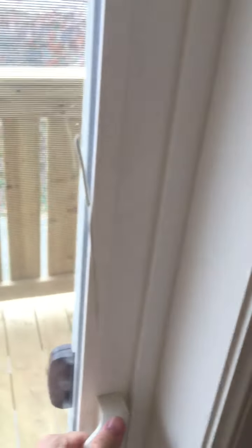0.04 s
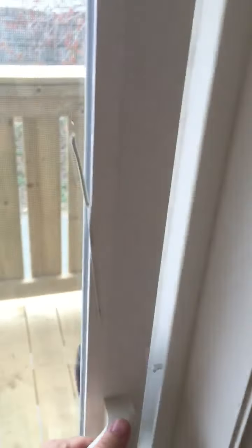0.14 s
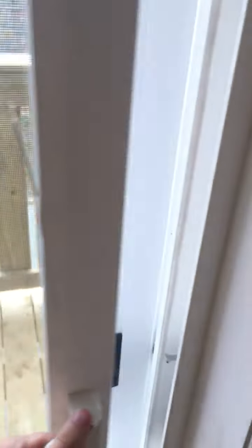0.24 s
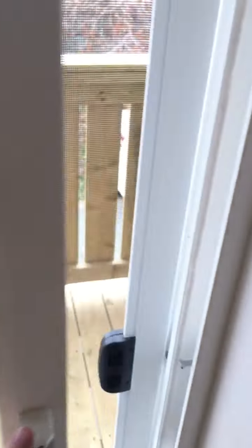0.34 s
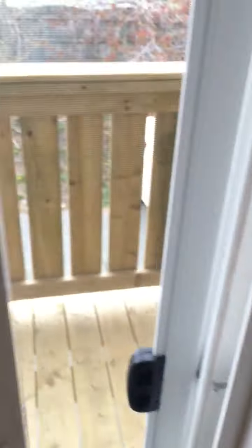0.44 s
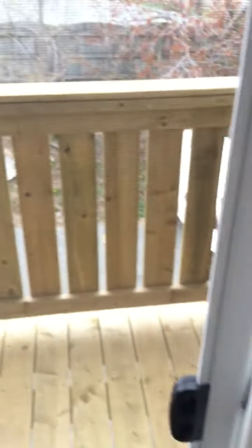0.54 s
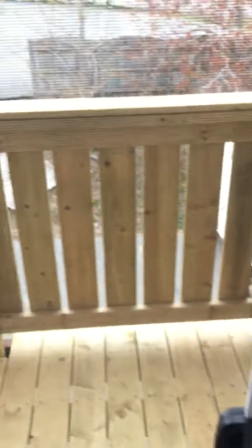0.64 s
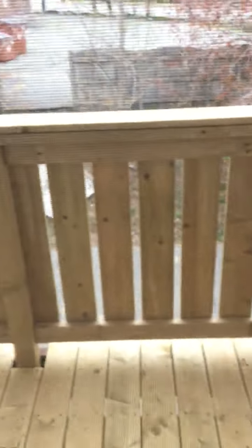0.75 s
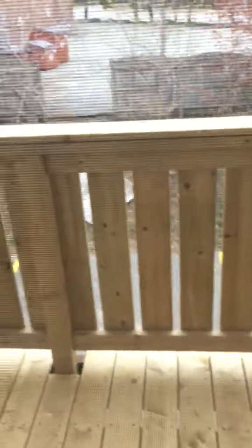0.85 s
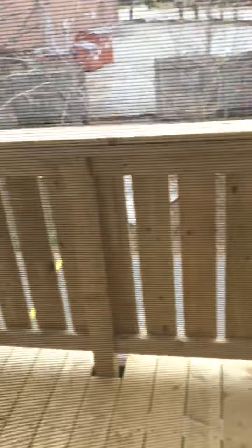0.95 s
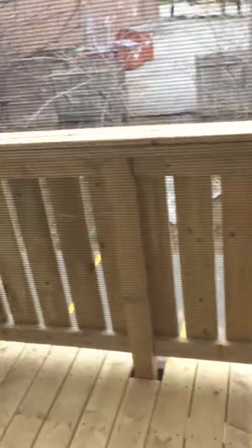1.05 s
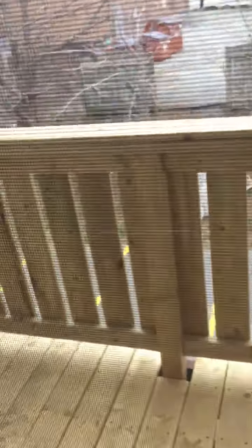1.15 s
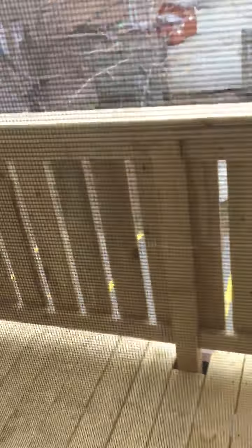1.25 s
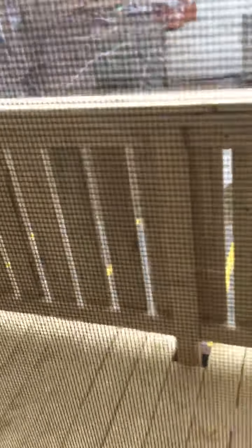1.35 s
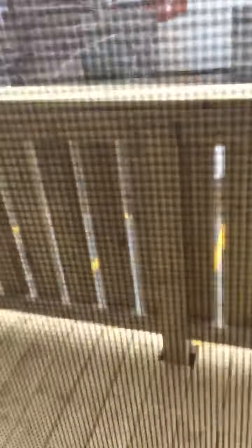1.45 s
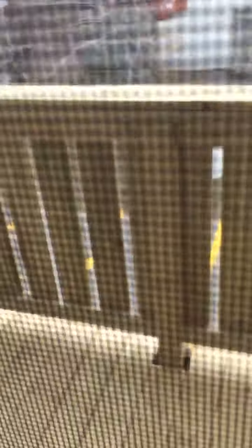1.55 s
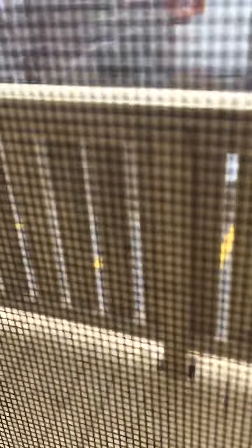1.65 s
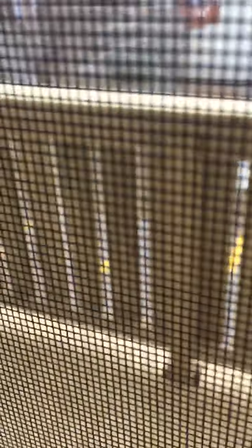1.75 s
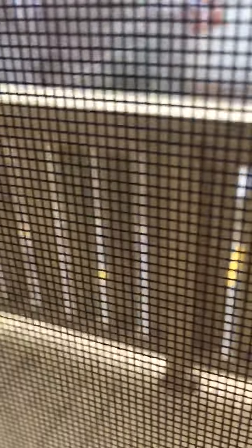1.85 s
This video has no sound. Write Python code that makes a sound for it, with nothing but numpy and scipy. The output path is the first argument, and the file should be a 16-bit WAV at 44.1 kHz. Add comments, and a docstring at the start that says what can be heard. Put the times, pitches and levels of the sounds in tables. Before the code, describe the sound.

A sliding glass door unlatches with a sharp metallic clack, rolls open with a brushing hiss and low rumble, then bumps its stop. The empty room rings and faint traffic drifts in. The microphone is close to the door.

```python
"""Sliding glass door in an empty room

One microphone, close to the door, with the bare room behind it. The door pulls out of its seal, the
latch clacks and rings, and it rolls open: the brush seal hisses on the track, the rollers rumble in the
pane. It bumps its stop, the pane booms and the walls ring, while distant traffic comes in at the gap."""
import sys
import numpy as np
from scipy import signal
from scipy.fft import rfft, irfft
from scipy.io import wavfile
from scipy.ndimage import uniform_filter1d

SR = 44100
rng = np.random.default_rng(int(sys.argv[2]) if len(sys.argv) > 2 else 0)


def dump_mix(stems):
    """Bounce the given channels to the path in sys.argv[1] as a 16-bit WAV at rate SR."""
    frames = np.atleast_2d(stems).T  # one column per channel
    limited = np.clip(frames, -1, 1)  # hard clip at full scale
    pcm = np.round(limited * 32767).astype(np.int16)
    wavfile.write(sys.argv[1], SR, pcm)


N = 81585
TIME = np.arange(N) / SR
FREQS = np.arange(N // 2 + 1) * SR / N


def undb(db):
    """Decibels to gain."""
    return 10 ** (np.asarray(db) / 20)


def unit(x):
    """Scale to rms 1."""
    return x / np.sqrt(np.mean(x ** 2) + 1e-20)


def curve(rows):
    """Gain over time from (t/s, level/dB) rows."""
    return undb(np.interp(TIME, *np.array(rows).T))


def ramp(start, length):
    """Straight rise from 0 to 1; times in seconds."""
    return np.clip((TIME - start) / length, 0, 1)


def fade(start, t60):
    """Exponential decay from a moment on, 60 dB down after t60 seconds."""
    age = TIME - start
    return (age >= 0) * np.exp(-np.log(1000) * np.maximum(age, 0) / t60)


def along_hz(rows):
    """Spread (f/Hz, value) rows over the spectrum on a log-frequency axis."""
    hz, values = np.array(rows, float).T
    return np.interp(np.log(FREQS + 1e-3), np.log(hz), values)


def colour(x, spectrum, corner_hz=1e6):
    """Give a signal a spectrum, rolled off above a corner; rms 1."""
    gain = undb(along_hz(spectrum)) / np.sqrt(1 + (FREQS / corner_hz) ** 4) * (FREQS > 18)
    return unit(irfft(rfft(x) * gain, N))


def noise(spectrum, corner_hz=1e6):
    """Noise of a given spectrum; rms 1."""
    return colour(rng.standard_normal(N), spectrum, corner_hz)


def wander(rate_hz):
    """Smooth random drift; rms 1."""
    hold = int(SR / rate_hz)
    steps = np.repeat(rng.standard_normal(N // hold + 1), hold)
    return unit(uniform_filter1d(uniform_filter1d(steps, hold), hold)[:N])


def impulses(per_s):
    """Randomly timed clicks of either sign."""
    return (rng.random(N) < per_s / SR) * rng.choice([-1, 1], N)


def burst(grain, envelope):
    """Grain under an envelope, scaled to the envelope's energy."""
    shaped = grain * envelope
    return shaped * np.sqrt(np.sum(envelope ** 2) / (np.sum(shaped ** 2) + 1e-20))


def ring(start, modes):
    """Damped modes struck at a moment, each swinging out either way."""
    return sum(rng.choice([-1, 1]) * undb(db) * fade(start, t60) * np.sin(2 * np.pi * hz * (TIME - start))
               for hz, db, t60 in modes)


def blows(rows, spectrum):
    """Contacts on the door frame: dense short ringing, duller when the contact is soft."""
    return sum(undb(db) * burst(noise(spectrum, hz), fade(start, t60)) for start, db, hz, t60 in rows)


# Mains tones in the room: f/Hz, level/dB
MAINS_TONES = [(59.5, -66), (237, -69.5)]
def hum():
    """Faint, steady mains hum in the room."""
    return sum(undb(db) * np.sin(2 * np.pi * (hz * TIME + rng.random())) for hz, db in MAINS_TONES)


# Distant traffic, heard from indoors: f/Hz, level/dB
TRAFFIC_SPECTRUM = [(22, -24), (42, -7), (60, 3), (90, -4), (140, -3), (240, -5), (330, -9), (520, -12),
                    (800, -3), (1100, -4), (1700, -14), (3000, -23), (6000, -30), (10000, -38),
                    (16000, -48)]
def traffic(shut_db=-64, open_db=-43.5, opens_s=0.22, wide_s=1.4):
    """Traffic far outside; its power at the microphone grows with the width of the gap."""
    gap = ramp(opens_s, wide_s - opens_s)
    power = undb(shut_db) ** 2 + gap * undb(open_db) ** 2
    return noise(TRAFFIC_SPECTRUM) * np.sqrt(power) * undb(0.76 * wander(rate_hz=5.3))


# Tone of the bare room behind the door: f/Hz, level/dB
ROOM_SPECTRUM = [(40, 0), (150, 4.5), (400, 1), (800, 1), (1200, -3), (2000, -6), (4000, -7), (16000, -8)]
# Its reverberation time by band: f/Hz, t60/s
ROOM_DECAY = [(60, 0.98), (300, 0.85), (900, 1.43), (2000, 0.72), (5000, 1.25), (16000, 0.74)]
def room(x, delay_s=0.011):
    """Diffuse ring of bare walls, just after the direct sound and longest in the middle range."""
    spectrum = rfft(noise(ROOM_SPECTRUM))
    tail = 0
    for hz, t60 in ROOM_DECAY:
        band = along_hz([(centre, centre == hz) for centre, _ in ROOM_DECAY])
        tail = tail + irfft(spectrum * band, N) * fade(delay_s, t60)
    return signal.fftconvolve(x, tail / np.sqrt(np.sum(tail ** 2)))[:N]


# Faint squeal at the track: t/s, f/Hz, level/dB
SQUEAL_PATH = [(0.82, 5290, -62), (0.865, 5340, -49), (0.9, 5400, -46), (0.935, 5440, -51),
               (0.99, 5450, -57), (1.05, 5480, -70)]
def squeal(wobble_hz=90):
    """The seal sings briefly on the track, with an unsteady pitch."""
    times, hz, db = np.array(SQUEAL_PATH).T
    pitch = np.interp(TIME, times, hz) + wobble_hz * wander(rate_hz=300)
    gain = undb(np.interp(TIME, times, db, left=-np.inf, right=-np.inf))
    return gain * np.sin(2 * np.pi * np.cumsum(pitch) / SR)


# Hiss of the bristles, close up: t/s, level/dB
BRISTLE_LEVEL = [(0.0, -95), (0.13, -77), (0.18, -53.5), (0.23, -50.5), (0.32, -46.5), (0.38, -45),
                 (0.7, -44), (1.02, -42), (1.27, -43), (1.45, -49), (1.63, -47), (1.69, -60), (1.745, -75),
                 (1.8, -57), (1.85, -53)]
# Its tone: f/Hz, level/dB
BRISTLE_SPECTRUM = [(2000, -7), (4000, -1), (4900, -4.5), (5500, 2.5), (6600, -1.5), (7500, -6), (9600, -2),
                    (10400, -9.5), (12000, -6), (16000, -22.5)]
def bristles(dull_hz=8140):
    """High hiss of the bristles, duller once the door slows down."""
    slowed = ramp(start=0.99, length=0.48)
    white = rng.standard_normal(N)
    bright = colour(white, BRISTLE_SPECTRUM)
    dull = colour(white, BRISTLE_SPECTRUM, dull_hz)
    return curve(BRISTLE_LEVEL) * ((1 - slowed) * bright + slowed * dull)


# The seal rubbing along the track, and its mid-treble scrape: t/s, level/dB
RUB_LEVEL = [(0.0, -98), (0.115, -72), (0.17, -45), (0.198, -41.5), (0.21, -34), (0.32, -35.5), (0.5, -37),
             (0.8, -35.5), (0.95, -36), (1.1, -38), (1.27, -41), (1.45, -40), (1.6, -41), (1.67, -44.5),
             (1.74, -52.5), (1.8, -48.5), (1.85, -52)]
SCRAPE_LEVEL = [(0.2, -70), (0.33, -42), (0.55, -49.5), (0.8, -41), (0.96, -49), (1.15, -55), (1.3, -67)]
# The tone of each: f/Hz, level/dB
RUB_SPECTRUM = [(100, -14), (300, -5.5), (520, -6), (700, -2.5), (950, 0), (1400, -1), (2000, -4.5),
                (3000, -8), (4000, -12), (4800, -16), (6500, -18), (8000, -26), (11000, -33), (16000, -41)]
SCRAPE_SPECTRUM = [(700, -22), (1700, 5.5), (2800, 3), (4200, -9), (6000, -10.5)]
def brush_seal(grit_db=-7, grit_spread_db=3.0, flutter_db=0.45):
    """Bristles and grit rub along the track near the microphone; the level flutters slightly."""
    grit = impulses(per_s=1800) * undb(grit_spread_db * np.minimum(rng.exponential(size=N), 5))
    rub = colour(rng.standard_normal(N) + undb(grit_db) * unit(grit), RUB_SPECTRUM) * curve(RUB_LEVEL)
    scrape = noise(SCRAPE_SPECTRUM) * curve(SCRAPE_LEVEL)
    return (rub + scrape + bristles()) * undb(flutter_db * wander(rate_hz=35.06))


# Rumble of the rollers: t/s, level/dB
ROLLER_LEVEL = [(0.0, -95), (0.19, -75), (0.23, -42), (0.36, -44), (0.55, -42), (0.78, -41), (0.89, -35.5),
                (0.96, -38.5), (1.04, -37.5), (1.12, -43), (1.27, -45), (1.5, -52), (1.85, -58)]
# Its tone in the glass: f/Hz, level/dB
ROLLER_SPECTRUM = [(22, -30), (45, -26), (62, -8.5), (110, -12), (160, -1), (220, 3.5), (265, 0.5),
                   (310, -4.5), (380, 4), (450, -16.5), (600, -12), (1200, -43.5)]
def rollers():
    """The rollers shake the pane as they run along the track."""
    return noise(ROLLER_SPECTRUM) * curve(ROLLER_LEVEL)


# Slow shudders of the glass: t/s, level/dB, rise/s, t60/s
PANE_SHUDDERS = [(0.222, -31, 0.036, 0.49), (0.33, -39, .02, 0.68), (1.3, -34.5, 0.018, .3),
                 (1.385, -31, 0.022, .4), (1.577, -41.5, 0.022, .3)]
# Their deep boom, close up: f/Hz, level/dB
PANE_SPECTRUM = [(20, -40), (38, -14), (58, 1), (88, 0), (112, -10), (170, -20), (300, -42)]
def pane():
    """The big pane booms after each jolt."""
    return sum(undb(db) * burst(noise(PANE_SPECTRUM), fade(start, t60) * ramp(start, rise))
               for start, db, rise, t60 in PANE_SHUDDERS)


# Knocks at the jamb: t/s, level/dB, roll-off f/Hz, t60/s
JAMB_KNOCKS = [(0.2065, -32.5, 1700, 0.16), (0.2325, -23, 524, 0.033), (0.268, -27.5, 342, .07),
               (0.2955, -25.5, 420, 0.032)]
# Their tone: f/Hz, level/dB
JAMB_SPECTRUM = [(40, -1), (90, 3.5), (200, -4), (400, 0.5), (540, -10), (900, 2.5), (1400, 4), (2200, -13),
                 (4000, -20), (16000, -34)]
def jamb():
    """The frame knocks as the door pulls free."""
    return blows(JAMB_KNOCKS, JAMB_SPECTRUM)


CATCH_S = 0.2813
# Modes of the steel catch: f/Hz, level/dB, t60/s
CATCH_MODES = [(4396, -8, .06), (5502, -1, .1), (6481, -12, .12), (7154, -7, .04), (9776, -2, .08),
               (11690, 0, .1), (12040, -2, .055), (14800, -3, .1)]
def catch_ring(gain_db=-31.5):
    """The steel catch rings on after springing back."""
    return undb(gain_db) * ring(CATCH_S, CATCH_MODES)


# Latch clacks, close up: t/s, ring level/dB, snap level/dB, snap roll-off f/Hz
LATCH_CLACKS = [(0.235, -42, -25, 5000), (0.2523, -18.5, -14, 14000), (0.2598, -20, -19, 10000)]
# Modes of the latch housing: f/Hz, level/dB, t60/s
HOUSING_MODES = [(770, -5, .04), (960, -4, .03), (1350, 0, .05), (1593, -3, .05), (2225, -9, .04),
                 (3335, -3, .018), (3650, -7, .015)]
# Tone of the latch's snap and of the catch's tick: f/Hz, level/dB
SNAP_SPECTRUM = [(300, -16), (900, 6), (3500, 5), (6300, 1), (8500, -11), (12000, -5.5), (16000, -16)]
TICK_SPECTRUM = [(1500, -3), (4200, 3.5), (7300, -3), (9000, -1.5), (11500, -2), (16000, -7)]
def latch(tick_db=-25):
    """The latch clacks in its housing, then the steel catch springs back with a tick."""
    clacks = 0
    for start, ring_db, snap_db, corner_hz in LATCH_CLACKS:
        housing = ring(start, HOUSING_MODES)
        snap = burst(noise(SNAP_SPECTRUM, corner_hz), fade(start, t60=0.0071))
        clacks = clacks + undb(ring_db) * housing + undb(snap_db) * snap
    tick = burst(noise(TICK_SPECTRUM), fade(CATCH_S, t60=0.029))
    return clacks + undb(tick_db) * tick


# Modes of the door's frame: f/Hz, level/dB, t60/s
FRAME_MODES = [(158, -4, .35), (226, -7, .5), (257, -5, .6), (378, -4, .5), (476, -9, .6), (628, -9, .7),
               (766, -8, 1.0), (889, -4, .4), (1040, -6, .7), (1133, -3, .4), (1258, 2, .2), (1630, -6, .3),
               (2462, -6, .12)]
def frame_ring(struck_s=1.304, gain_db=-32):
    """The frame rings on after striking the stop."""
    return undb(gain_db) * ring(struck_s, FRAME_MODES)


# Tone of the chatter at the stop: f/Hz, level/dB
CHATTER_SPECTRUM = [(150, -5), (400, -1), (1300, 4), (2500, 0), (3600, -8), (4500, -8.5), (5800, -12),
                    (8500, -15.5), (11000, -22), (16000, -24)]
def chatter(start_s=1.298, length_s=0.027, rise_s=0.0014, fall_s=0.0047, level_db=-24.5):
    """A quick run of tiny contacts while the frame settles against the stop."""
    window = ramp(start_s, rise_s) * np.clip((start_s + length_s - TIME) / fall_s, 0, 1)
    contacts = unit(impulses(per_s=800)) + 0.5 * rng.standard_normal(N)
    return undb(level_db) * burst(colour(contacts, CHATTER_SPECTRUM), window)


# Bumps at the end of the track: t/s, level/dB, roll-off f/Hz, t60/s
STOP_BUMPS = [(1.2977, -20, 2980, 0.061), (1.303, -14.5, 2560, 0.044), (1.3052, -15.5, 8900, 0.016),
              (1.312, -14.5, 690, 0.043), (1.3182, -27, 4000, 0.028)]
# Their tone in the frame: f/Hz, level/dB
BUMP_SPECTRUM = [(40, 4), (150, -2), (380, 1.5), (550, -7.5), (900, 3), (1280, 2), (1800, 0), (2400, -4),
                 (3300, -4.5), (4500, -12), (5600, -5), (8000, -17), (16000, -20)]
def door_stop():
    """The door bumps its stop in several quick contacts and chatters against it."""
    return blows(STOP_BUMPS, BUMP_SPECTRUM) + chatter()


def scene(release_wet_db=-13, stop_wet_db=-6.5):
    """The door close by, the room behind it; one microphone feeds both channels."""
    release = latch() + jamb()
    stop = door_stop()
    walls = room(undb(release_wet_db) * release + undb(stop_wet_db) * stop)
    ringing = catch_ring() + frame_ring()
    sliding = brush_seal() + rollers() + squeal()
    door = release + sliding + stop + ringing + pane()
    mono = door + walls + traffic() + hum()
    return np.array([mono, mono])


def record(dry, low_cut_hz=46, top_hz=15850):
    """The recorder drops the deepest bass and cuts the top."""
    low_cut = signal.butter(4, low_cut_hz, "high", fs=SR, output="sos")
    high_cut = signal.ellip(10, 0.2, 70, top_hz, fs=SR, output="sos")
    return signal.sosfilt(high_cut, signal.sosfilt(low_cut, dry))


dry = scene()
out = record(dry)
dump_mix(out)
```